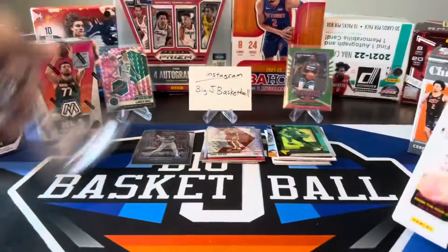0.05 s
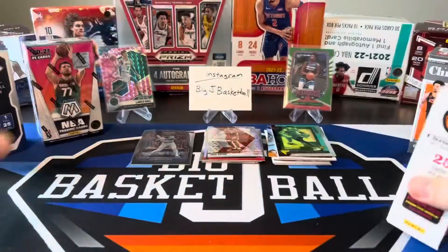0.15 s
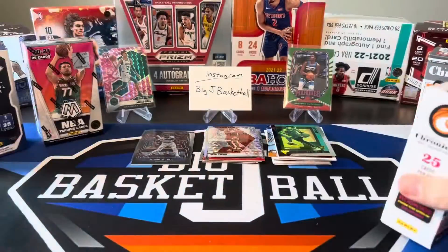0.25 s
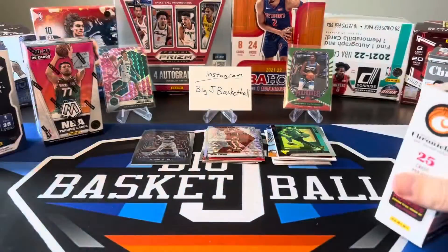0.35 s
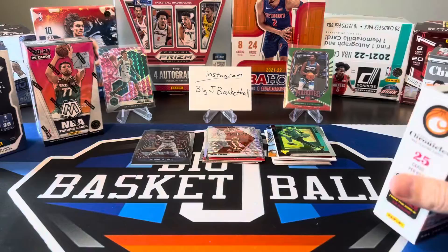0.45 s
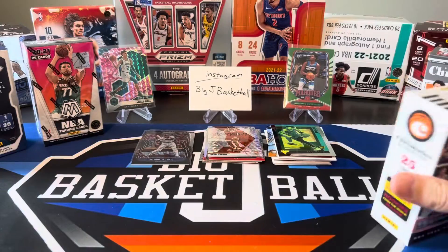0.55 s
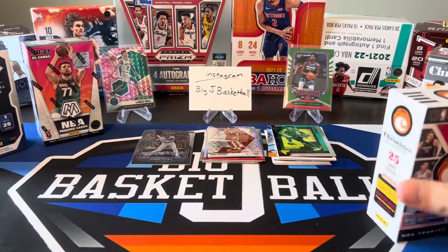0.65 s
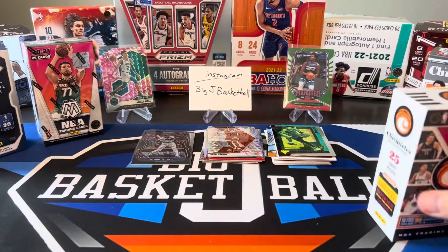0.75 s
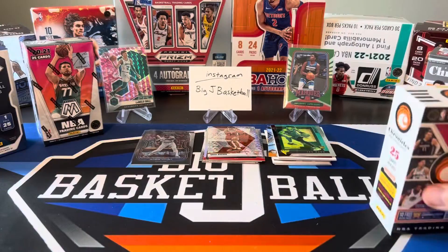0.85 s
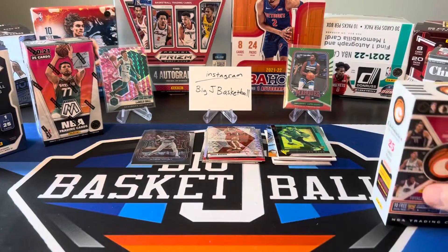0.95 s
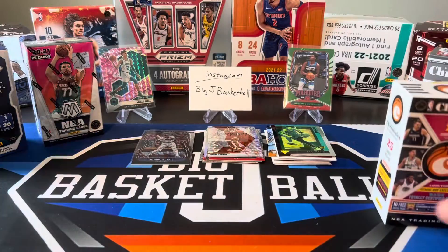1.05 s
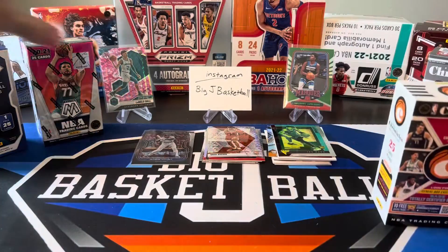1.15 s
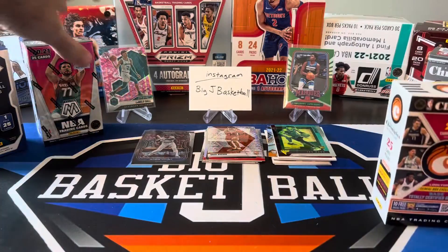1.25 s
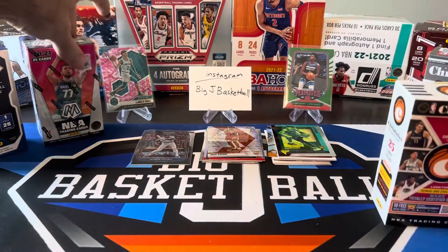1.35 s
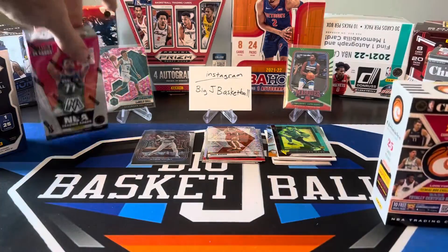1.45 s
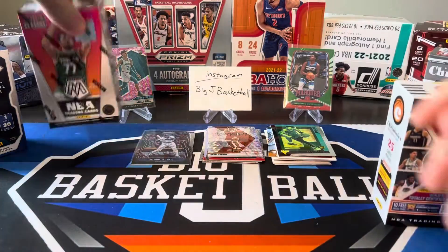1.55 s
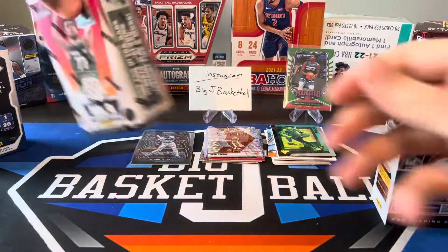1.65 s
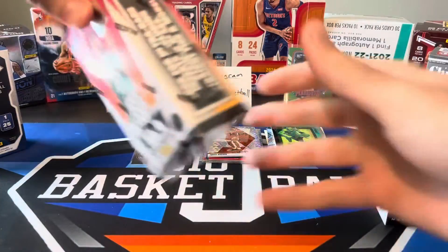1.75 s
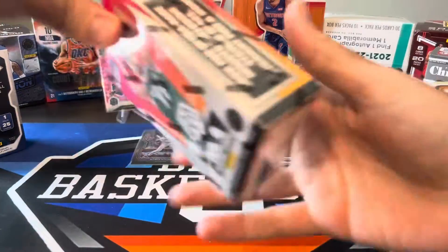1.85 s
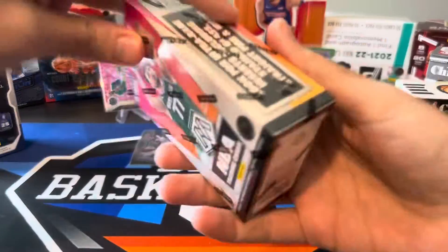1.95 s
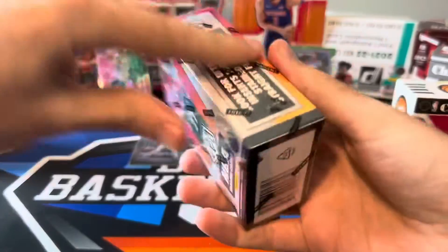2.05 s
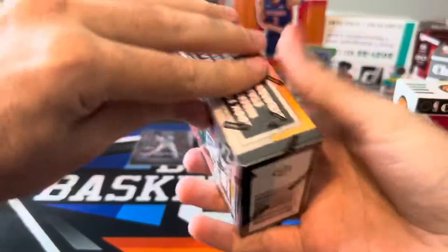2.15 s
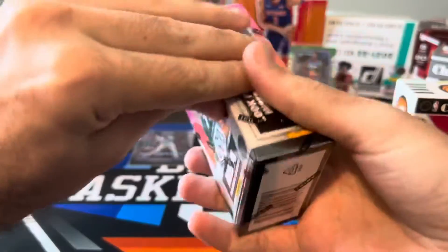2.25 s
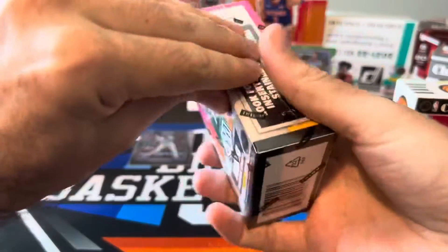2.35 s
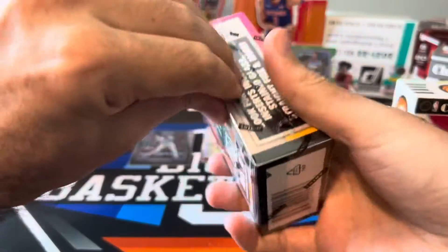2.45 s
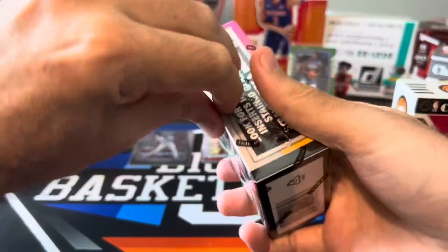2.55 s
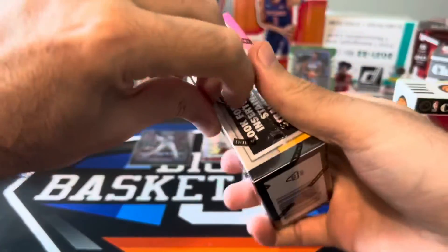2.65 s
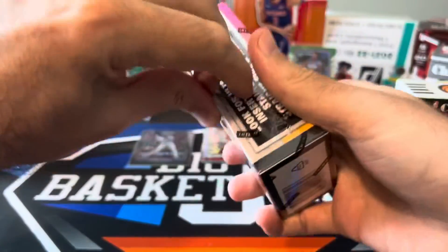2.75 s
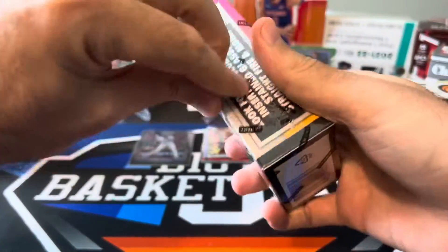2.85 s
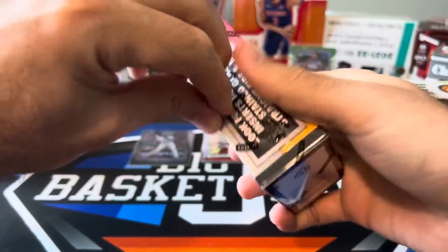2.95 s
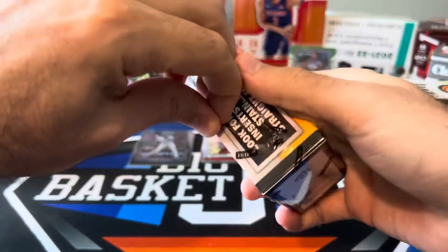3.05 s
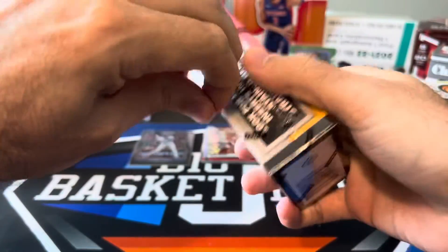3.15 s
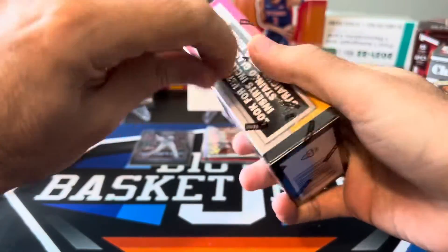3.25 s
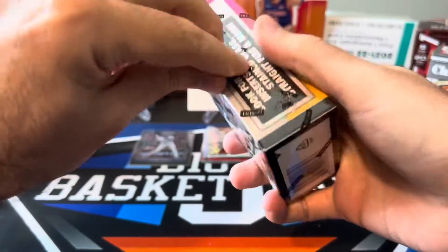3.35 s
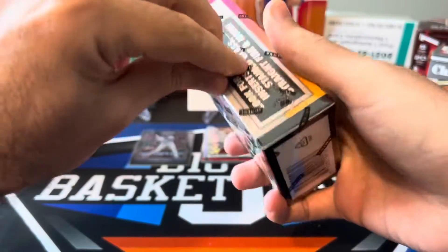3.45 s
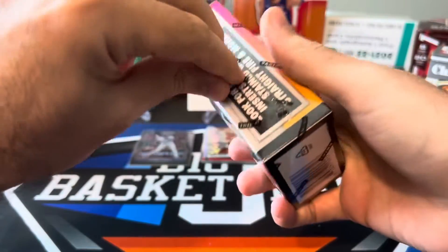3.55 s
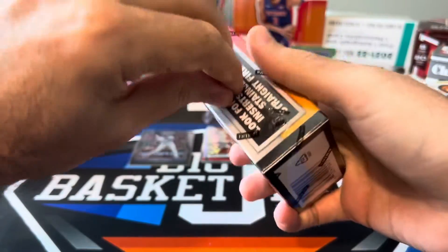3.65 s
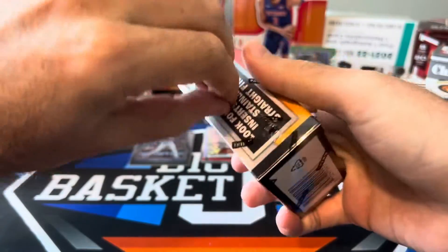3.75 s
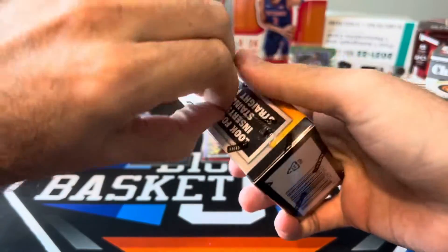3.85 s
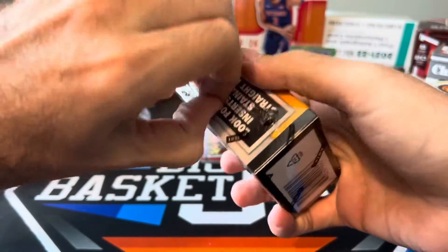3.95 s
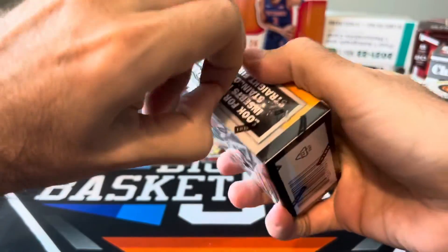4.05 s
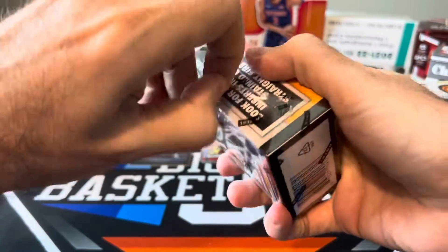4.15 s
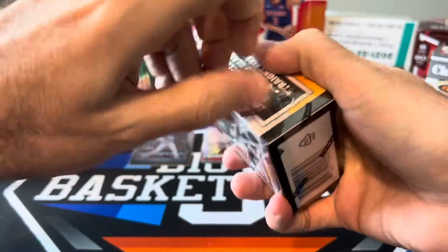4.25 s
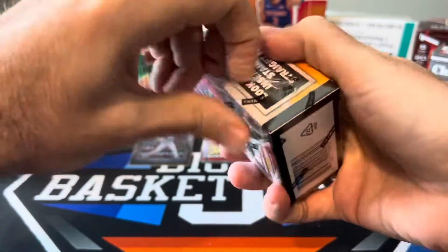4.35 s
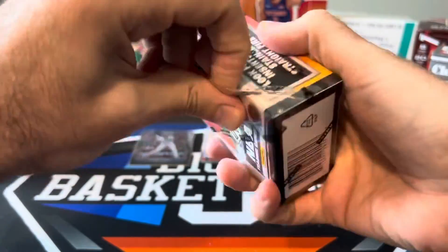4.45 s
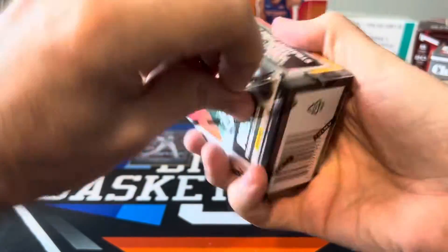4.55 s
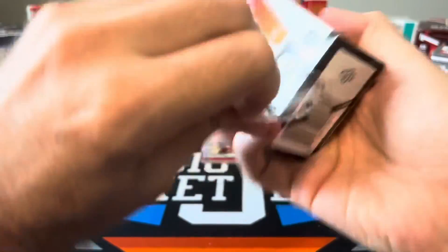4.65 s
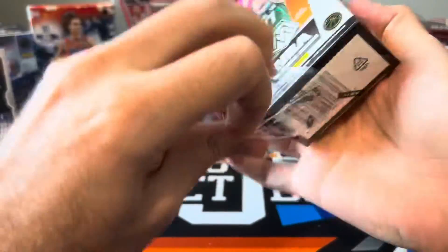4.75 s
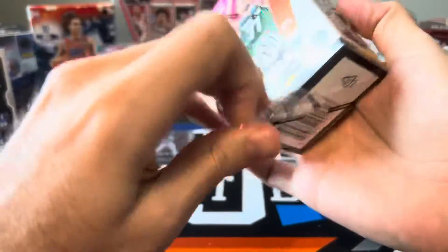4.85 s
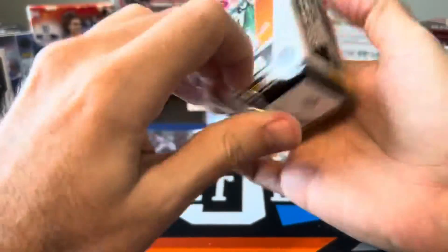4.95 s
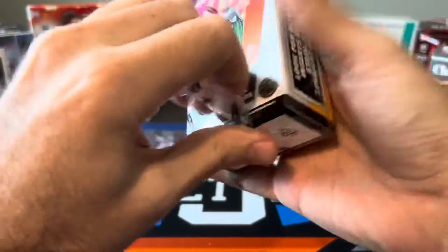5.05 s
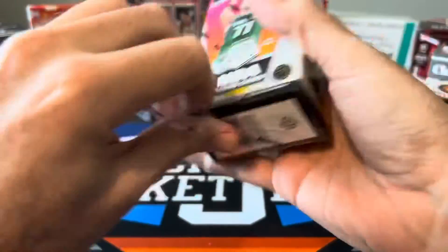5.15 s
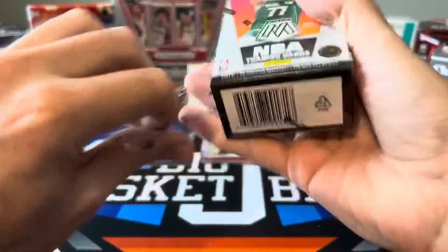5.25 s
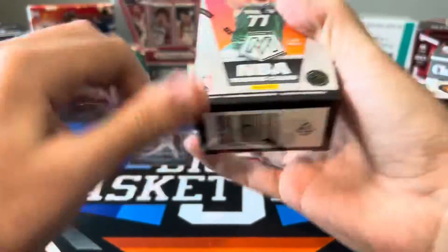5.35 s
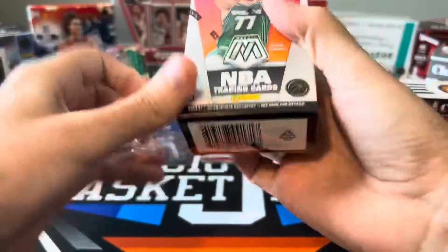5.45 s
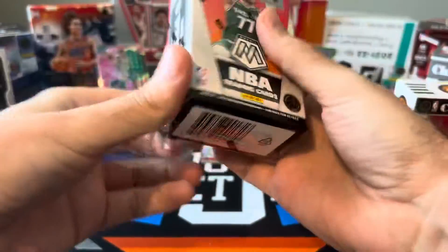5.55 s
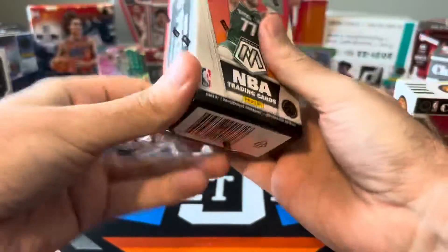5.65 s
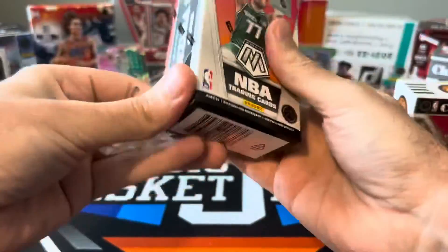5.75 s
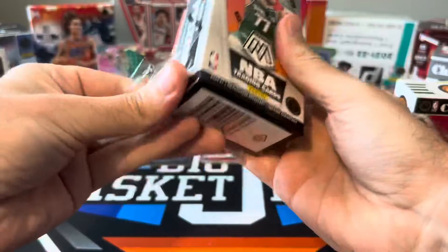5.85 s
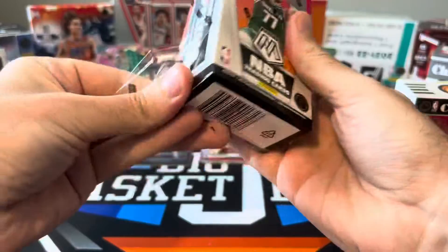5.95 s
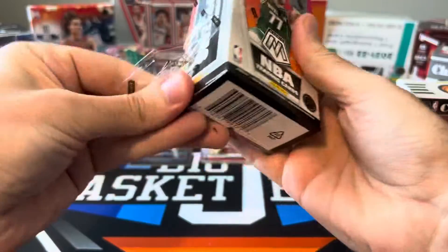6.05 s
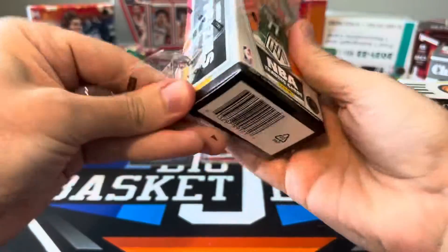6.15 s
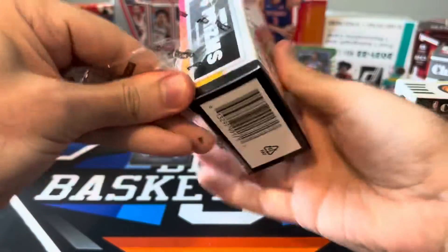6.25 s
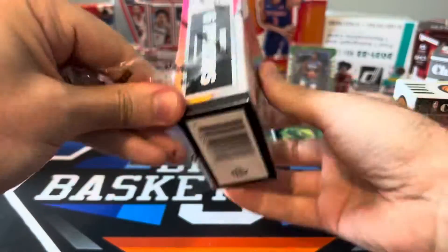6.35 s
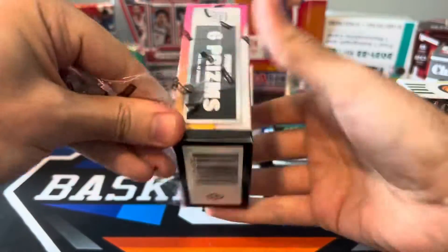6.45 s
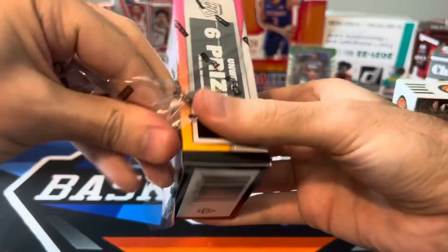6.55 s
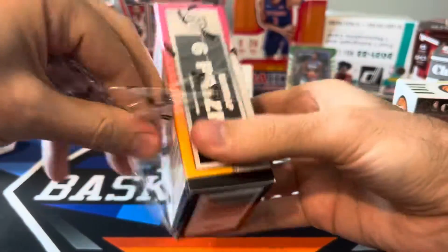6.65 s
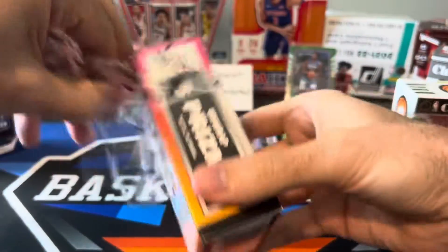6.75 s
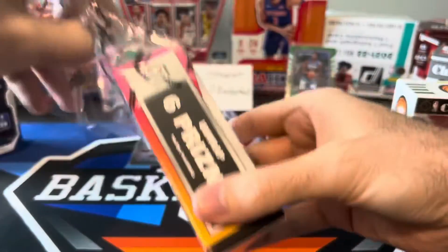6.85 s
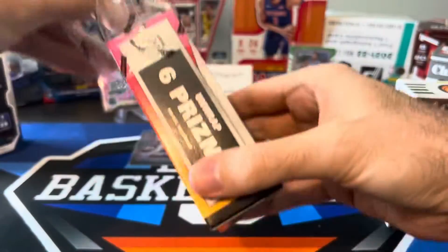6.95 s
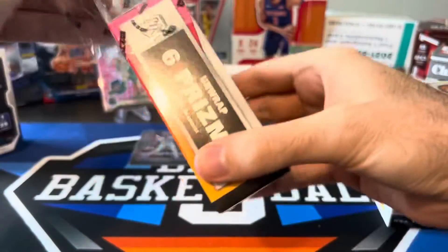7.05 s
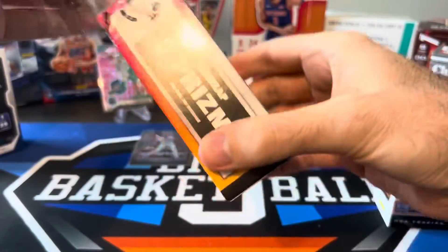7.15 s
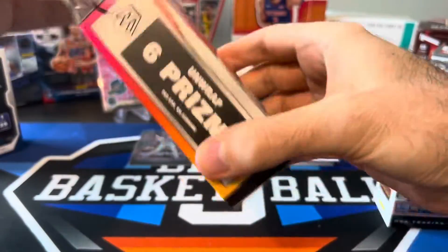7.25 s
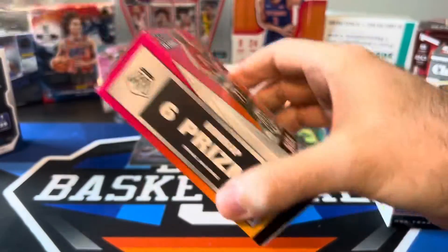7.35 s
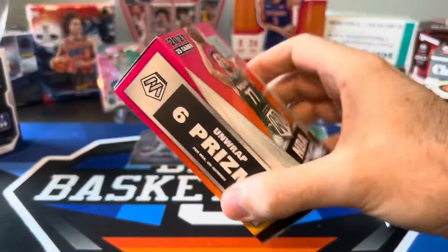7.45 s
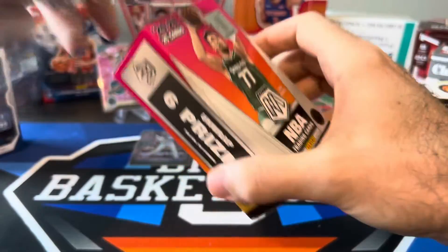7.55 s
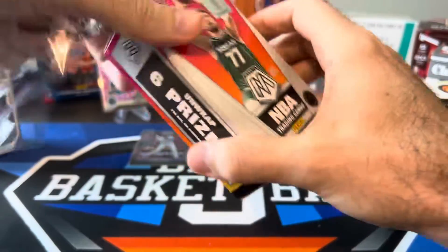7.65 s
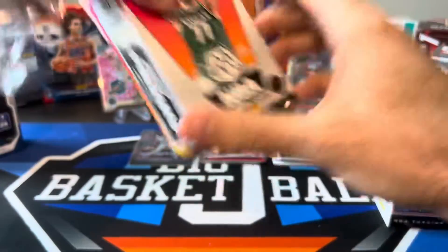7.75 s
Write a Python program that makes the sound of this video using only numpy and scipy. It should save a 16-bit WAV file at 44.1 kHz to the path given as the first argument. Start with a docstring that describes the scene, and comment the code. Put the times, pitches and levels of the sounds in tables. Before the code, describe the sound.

Close-up unwrapping of a small card box: sparse taps and rustles, then sharp film snaps and busy, bright plastic crackling, over faint room hum.

```python
"""Clear plastic wrap is torn off a small cardboard box, close to the microphone in a small room.
The taut film lets go in bright ringing snaps; the loose film crinkles in trains of tiny clicks over a hiss.
Knocks ring the hollow walls and the air in the box, and fingers rub on the card in dull stick-slip grains.
Behind them lie a desk rumble, a low hum and still air, all from filtered noise and a sine.
Film and box also reach both microphone ports by way of the room's echoes."""
import sys
import numpy as np
from scipy import signal
from scipy.fft import rfft, irfft, next_fast_len
from scipy.io import wavfile
from scipy.ndimage import uniform_filter1d

SR = 44100
rng = np.random.default_rng(int(sys.argv[2]) if len(sys.argv) > 2 else 0)


def store_wav(level_fs):
    """Save 16-bit WAV to argv[1]."""
    pcm = np.round(np.clip(np.atleast_2d(level_fs), -1, 1) * 32767)
    wavfile.write(sys.argv[1], SR, pcm.T.astype(np.int16))


N = 343539
TIME = np.arange(N) / SR
# one short blow, and the whole track with a second to spare: lengths in samples, frequency bins in Hz
SHORT, LONG = 2048, next_fast_len(N + SR, True)
SHORT_HZ = np.maximum(np.fft.rfftfreq(SHORT, 1 / SR), 1)
LONG_HZ = np.maximum(np.fft.rfftfreq(LONG, 1 / SR), 1)

# How alike diffuse sound is at the two ports. Each row: frequency in Hz, likeness from 0 to 1.
ROOM_LIKENESS = [(100, 0.91), (300, 0.846), (700, 0), (2000, 0.4), (14000, 0.48)]


def from_db(db):
    """Decibels to amplitude gain."""
    return 10 ** (np.asarray(db) / 20)


def rms_one(x):
    """Scale to unit rms."""
    return x / np.sqrt(np.mean(x ** 2) + 1e-20)


def at_hz(points, hz):
    """Read a table on a log-frequency axis."""
    f, value = np.transpose(points)
    return np.interp(np.log(hz), np.log(f), value)


def filtered(x, response):
    """Pass a whole track through a frequency response."""
    return irfft(rfft(x, LONG) * response, LONG)[..., :N]


def add(out, s, sound):
    """Mix a short sound in at time s in seconds."""
    i = int(np.clip(round(s * SR), 0, N - 1))
    out[:, i:i + SHORT] += sound[:, :N - i]


def pair(spectra, likeness, hz):
    """Two unrelated spectra become left and right with the given likeness."""
    alike = np.clip(at_hz(likeness, hz), 0, 1)
    middle = np.sqrt((1 + alike) / 2) * spectra[0]
    side = np.sqrt((1 - alike) / 2) * spectra[1]
    return middle + side * [[1], [-1]]


def drift(per_s):
    """A wander along straight lines between normal random values, per_s of them each second."""
    knots = rng.standard_normal(4096)
    return np.interp(TIME * per_s, np.arange(len(knots)), knots)


def noise(spectrum):
    """Steady stereo noise of the given colour; rms 1."""
    white = pair(rfft(rng.standard_normal((2, LONG))), ROOM_LIKENESS, LONG_HZ)
    return rms_one(irfft(white * from_db(at_hz(spectrum, LONG_HZ)), LONG)[:, :N])


def flutter(t60, smooth_hz, rise_s=.0001):
    """Stereo spectrum of a sheet's many short-lived modes: a noise burst that swells and dies over t60 s."""
    # How alike close sound is at the two ports. Each row: frequency in Hz, likeness from 0 to 1.
    near_likeness = [(100, 0.884), (700, 0.92), (3000, 0.44), (14000, 0.94)]
    t = np.arange(SHORT) / SR
    burst = rng.standard_normal((2, SHORT)) * from_db(-60 * t / t60) * (1 - np.exp(-t / rise_s))
    modes = pair(rfft(burst), near_likeness, SHORT_HZ)
    middle_power = np.abs(modes.mean(axis=0)) ** 2
    side_power = 0.095 * np.abs(modes[0] - modes[1]) ** 2
    # even out the power over frequency, but keep detail finer than smooth_hz
    power = uniform_filter1d(middle_power + side_power, max(3, int(smooth_hz * SHORT / SR)))
    return modes / np.sqrt(power)


def causal(db):
    """Minimum-phase response for a short spectrum in dB: nothing sounds before the blow."""
    cepstrum = irfft(np.log(from_db(db)))
    cepstrum[1:SHORT // 2] *= 2
    cepstrum[SHORT // 2 + 1:] = 0
    return np.exp(rfft(cepstrum))


def grains(spectrum, per_s, spread_db, t60, vary_db, count):
    """Random slips of very uneven size, dealt to patches with a colour and ring of their own; rms 1."""
    sizes = from_db(spread_db * np.minimum(rng.exponential(1, N), 4)) * rng.choice([-1, 1], N)
    clicks = sizes * (rng.random(N) < per_s / SR)
    dealt, out = rng.integers(0, count, N), 0
    for patch in range(count):
        # each point of the colour shifts by up to vary_db either way
        shift_db = vary_db * (2 * rng.random((len(spectrum), 1)) - 1)
        own = np.array(spectrum) + [0, 1] * shift_db
        ring = irfft(flutter(t60, smooth_hz=5685) * causal(at_hz(own, SHORT_HZ)))
        patch_clicks = (clicks * (dealt == patch))[None]
        out = out + signal.oaconvolve(patch_clicks, ring[:, :SHORT // 2], axes=1)[:, :N]
    # denser clicks come smaller, so the pace alone does not set the loudness
    return rms_one(out / np.sqrt(per_s))


def chance_moments(level_db, spread_db, count):
    """Unevenly scattered times in s, each with a strength in dB that follows the given level."""
    s = (np.arange(count) + rng.random(count)) / count * TIME[-1]
    return s, np.interp(s, TIME, level_db) + spread_db * (2 * rng.random(count) - 1)


def jostle(rub_db, rest_db=-68, arms_db=-65, follows=0.46, fade_s=0.045):
    """Level of the desk's rumble in dB: the arms pass on some of the rubbing, each bump shakes it briefly."""
    # Arms and box bump the desk. Each row: start in seconds, level in dB.
    bumps = [(0.52, -50), (1.29, -46), (1.89, -46.5), (3.09, -56), (3.47, -64), (4.19, -55), (4.98, -53),
             (5.42, -43), (5.79, -58), (6.38, -49.5), (6.64, -44), (6.771, -40), (7.01, -42.5),
             (7.25, -46.5), (7.647, -46)]
    power = from_db(rest_db) ** 2 + from_db(arms_db + follows * (rub_db - rub_db.mean())) ** 2
    for s, level_db in bumps:
        shaken = power[int(s * SR):][:SR // 2]
        shaken += (from_db(level_db) * np.exp(-TIME[:len(shaken)] / fade_s)) ** 2
    return 10 * np.log10(power)


def background(jostle_db, lumpy_db=6.0, hum_hz=120, hum_db=-69, air_db=-70):
    """Dull jostling of the desk as wavering low noise, a steady mains hum and still air."""
    # Colours of desk and air. Each row: frequency in Hz, relative density in dB per Hz.
    desk = [(20, -40.5), (35, -13.5), (55, 1.5), (80, 1), (125, 2.5), (180, -5), (280, -13.5), (600, -42)]
    air = [(30, -14.5), (120, 5.5), (250, -4.5), (500, -15), (1500, -24), (5000, -32.5), (15000, -44)]
    rumble = from_db(jostle_db + lumpy_db * drift(22)) * noise(desk)
    hum = from_db(hum_db) * np.sqrt(2) * np.sin(2 * np.pi * hum_hz * TIME)
    return rumble + hum + from_db(air_db) * noise(air)


def room(x, first_s=0.0071, early=1.0, early_s=0.049):
    """Echoes start with desk and shelves; each band of the tail dies at its own pace, slowest near 1.5 kHz."""
    # Strength of the echoes. Each row: frequency in Hz, echo energy relative to direct in dB.
    room_level = [(100, -11), (400, -10.5), (1000, -9.5), (3000, -8.5), (7000, -11), (14000, -27)]
    # Decay of the late tail. Each row: frequency in Hz, time to fall 60 dB in seconds.
    room_t60 = [(100, 0.28), (500, 0.13), (1500, 0.42), (3500, 0.39), (7000, 0.29), (15000, 0.21)]
    t, hz = np.arange(SR // 2) / SR, np.maximum(np.fft.rfftfreq(SR // 2, 1 / SR), 1)
    white = pair(rfft(rng.standard_normal((2, SR // 2))), ROOM_LIKENESS, hz)
    centres = np.geomspace(100, 16000, 10)   # overlapping bands, Hz
    tail = 0
    for centre, share in zip(centres, np.eye(len(centres))):
        decay = from_db(-60 * t / at_hz(room_t60, centre))
        fade = (t > first_s) * decay * (1 + early * np.exp(-t / early_s))
        band = irfft(white * np.interp(np.log(hz), np.log(centres), share))
        tail = tail + band * fade / np.linalg.norm(fade) * from_db(at_hz(room_level, centre))
    return filtered(x, rfft(tail, LONG))


def hands(holding_db=-4.5, attack_s=0.0051, sag_db_per_s=17, release_s=0.034):
    """Driving levels of film and rubbing in dB: strokes swell, sag as the film yields, then die away."""
    # The loose film stirs between strokes, liveliest late on. Each row: time in seconds, level in dB.
    loose_film = [(0, -66.5), (.65, -71), (1.05, -83.5), (1.8, -88), (2.1, -73.5), (2.7, -77.5), (3.3, -88),
                  (3.6, -75.5), (3.8, -76), (4.3, -65), (4.7, -60), (6.3, -56.5), (6.6, -53.5), (7.4, -56),
                  (7.78, -66.5)]
    # The hands grip, pull or crumple. Each row: start in seconds, length in seconds,
    # crinkling film in dB, rubbing on card in dB; both levels are those at the start, before the sag.
    strokes = [(0.0, .21, -47, -56.5), (0.28, 0.34, -55, -61), (0.783, 0.032, -61, -60),
               (0.895, .03, -65, -59.5), (1.149, 0.04, -55.5, -62.5), (1.222, 0.094, -66, -64.5),
               (1.894, .07, -70.5, -52.5), (2.029, 0.131, -67, -63), (2.176, 0.15, -63.5, -54.5),
               (2.38, 0.097, -60.5, -49), (2.561, 0.076, -64, -52.5), (2.798, 0.16, -70, -63),
               (3.003, 0.33, -69.5, -60), (3.843, 0.14, -65, -64), (4.05, 0.031, -58, -71),
               (4.127, 0.07, -62.5, -49.5), (4.35, 0.17, -51.5, -52.5), (4.567, 0.066, -43.5, -39.5),
               (4.681, 0.024, -43.5, -48.5), (4.796, 0.081, -43.5, -49), (4.965, 0.1, -53.5, -47),
               (5.103, 0.092, -43.5, -42), (5.271, 0.038, -42.5, -50.5), (5.394, 0.2, -43.5, -48.5),
               (5.661, 0.051, -49, -59), (5.806, 0.037, -44.5, -79), (5.923, 0.0359, -50.5, -49),
               (6.038, 0.044, -52.5, -55.5), (6.417, 0.12, -54, -54), (6.578, 0.3, -36.5, -44.5),
               (6.714, 0.034, -37, -36), (6.88, 0.18, -63, -54.5), (6.989, 0.0395, -35.5, -50),
               (7.081, 0.099, -43, -52), (7.224, 0.035, -38.5, -39.5), (7.32, 0.015, -35.5, -52),
               (7.374, 0.11, -50, -64), (7.614, 0.094, -54, -52.5)]
    loose = from_db(np.interp(TIME, *np.transpose(loose_film)))
    # fingers that only hold the box rub holding_db relative to the loose film
    power = np.array([loose, loose * from_db(holding_db)]) ** 2
    for start, length, film_db, rub_db in strokes:
        near = slice(max(0, int((start - .1) * SR)), int((start + length + .4) * SR))
        t = TIME[near] - start
        swell = np.exp(np.minimum(t, 0) / attack_s - np.maximum(t - length, 0) / release_s)
        power[:, near] += (from_db([[film_db], [rub_db]]) * swell * from_db(-sag_db_per_s * t)) ** 2
    return 10 * np.log10(power)


def rubbing(rub_db, gain_db=-1.5):
    """Fingers stick and slip on the hollow box: dull grains at a wandering pace."""
    # Colour of rubbed card. Each row: frequency in Hz, relative density in dB per Hz.
    card = [(120, -17), (250, -3.5), (400, 1), (600, -5), (900, -7.5), (1200, -10), (1700, -9.5),
            (3000, -15.5), (7000, -28)]
    pace = 350 * from_db(4.9 * drift(25))   # slips per second
    slips = grains(card, pace, spread_db=3.0, t60=0.07, vary_db=3.0, count=12)
    return from_db(rub_db + gain_db) * slips


def small_knocks(rub_db, above_db=47, spread_db=5, wall_hz=750, spread_octaves=0.73, q=3.0, most_db=-3):
    """Small ringing pops scattered through the track, mostly pitched between 0.5 and 3 kHz and louder where the
    rubbing is stronger; rows as in the table of knocks."""
    s, level_db = chance_moments(rub_db + above_db, spread_db, count=70)
    pitch = wall_hz * 2 ** (spread_octaves * rng.standard_normal(len(s)))
    return np.column_stack([s, np.minimum(level_db, most_db), pitch, np.full(len(s), q)])


def bending(lag_s=.012, knee_hz=350):
    """Bending waves are slower at low pitch, so each blow chirps downward."""
    return np.exp(-2j * np.pi * lag_s * knee_hz * np.log1p(SHORT_HZ / knee_hz))


def box_knocks(light_taps, rattle=0.71, firmness=0.36, rattle_t60=0.033, rattle_rise_s=0.0012, soft_hz=3000,
               air_hz=417, air_width_hz=110, air_db=-6.5):
    """A blow drives a damped wall and the air behind it; other panels rattle. Rows: left, right, all round."""
    # A wall is knocked or pops back. Each row: start in seconds, level in dB,
    # wall resonance in Hz, sharpness Q.
    knocks = [(0.2956, -1.5, 575, 1.8), (0.5215, -2.5, 250, 0.13), (0.542, 3.5, 235, 5.8),
              (0.6866, -10.5, 1810, 2.8), (0.7544, -13.5, 250, 0.34), (0.894, -13.5, 230, .3),
              (1.18, -4, 280, 3.4), (1.2997, -4, 169, 2.3), (1.332, 4.5, 710, 2.5), (1.7, -13.5, 360, 9.6),
              (1.884, -11, 895, .4), (1.8993, 0.5, 216, 0.8), (1.936, -1.5, 402, 4.1), (2.1, -8, 765, 0.72),
              (2.116, -0.5, 560, 0.79), (2.385, -18, 480, 0.76), (2.4286, 4, 470, 1.1),
              (2.522, 5.5, 570, 0.91), (2.568, 7.5, 880, 4.9), (2.616, -6.5, 640, 0.14),
              (2.869, 1.5, 700, 1.15), (3.029, -10.5, 540, 0.75), (3.0827, 12.5, 600, 0.62),
              (3.727, -23, 588, 1.34), (3.9095, -6.5, 654, 0.66), (3.99, -4, 1100, 0.13),
              (4.1799, -0.5, 680, 0.15), (4.196, 2, 424, 7.2), (4.3074, -6, 800, 0.1),
              (4.38, 20.5, 1220, 1.25), (4.589, 21, 1660, 3.2), (4.764, 3, 232, 0.58),
              (4.909, -1.5, 270, 0.32), (4.9877, 11, 560, 0.18), (5.055, -4, 290, 0.087),
              (5.0625, 1, 2440, 3.9), (5.2011, 14, 780, 1.55), (5.356, -6.5, 460, 0.3),
              (5.424, 2.5, 613, 0.072), (5.511, -1.5, 540, .7), (5.662, 5, 350, 0.63),
              (5.7235, 11, 322, 0.69), (5.782, 14.5, 323, 0.5), (6.1018, -0.5, 1500, 2.2),
              (6.15, -14, 1500, .6), (6.1626, 4, 1260, .9), (6.3257, -5, 527, .35), (6.342, -3, 430, 0.37),
              (6.3726, 1.5, 370, 0.09), (6.506, -1.5, 290, 0.13), (6.6283, 22, 460, 2.5),
              (6.644, 7, 370, 0.088), (6.786, 8, 730, 0.084), (6.797, 3, 403, 0.54),
              (6.9688, 7.5, 229, 1.6), (7.0252, 5, 304, 0.14), (7.189, 4, 523, 0.29),
              (7.252, 8.5, 442, 0.11), (7.2822, 11, 624, 5.4), (7.4053, -2.5, 500, 2.3),
              (7.6403, 1.5, 276, 0.072), (7.709, -5, 600, 0.28)]
    out, hz = np.zeros((3, N)), SHORT_HZ
    air = from_db(air_db) / (1 + 1j * air_hz / air_width_hz * (hz / air_hz - air_hz / hz))
    for s, level_db, wall_hz, q in [*knocks, *light_taps]:
        resonance = 1 / (1 + 1j * q * (hz / wall_hz - wall_hz / hz))
        # two gentle low-passes soften the blow
        wall = bending() * (air + resonance) / (1 + 1j * hz / (2 * wall_hz)) / (1 + 1j * hz / soft_hz)
        # light touches scuff and rattle, firm ones pop cleanly
        scuff = rattle * from_db(-firmness * (level_db - 12.5)) * hz / (hz + 200)
        panels = wall * (1 + scuff * flutter(rattle_t60, 750, rattle_rise_s))
        panels *= np.linalg.norm(wall) / np.linalg.norm(panels.mean(axis=0))
        # the far panels ring on at their own pace, so the box feeds the room diffusely
        around = wall * flutter(t60=.08, smooth_hz=250).mean(axis=0)
        add(out, s, from_db(level_db) * irfft(np.vstack([panels, around])))
    return out


def crinkle(film_db, creases_per_s=750, busy=0.36, crease_db=2.0, fold_db=-7.0, buckle_db=-70.0, slide_db=-13):
    """Gently handled film mostly slides and hisses; worked harder, its creases and folds flip ever faster."""
    # Colours of the creases and of the larger folds of loose film.
    # Each row: frequency in Hz, relative density in dB per Hz.
    film = [(300, -11.5), (900, -0.5), (2000, -5), (3300, -2.5), (5000, 4.5), (8000, 5.5), (12500, 6),
            (14500, 4), (15600, 3), (16300, -26.5)]
    fold_colour = [(400, -10.5), (800, -10), (1150, -1.5), (1600, 0), (2200, -0.5), (3000, 5.5), (4200, -3),
                   (6000, -16), (9000, -15)]
    pace = from_db(busy * np.clip(film_db + 50, -30, 15) + 6.0 * drift(45))
    creases = grains(film, creases_per_s * pace, spread_db=5.5, t60=0.026, vary_db=14.0, count=18)
    folds = grains(fold_colour, 110 * pace, spread_db=2.0, t60=0.032, vary_db=23.5, count=16)
    flips = from_db(crease_db) * creases + from_db(fold_db) * folds
    # share of buckling film: half at buckle_db, nearly all of it well above
    buckling = 1 / (1 + from_db(buckle_db - film_db))
    sliding = np.sqrt(from_db(2 * slide_db) + .5 * (1 - buckling))
    return from_db(film_db) * (np.sqrt(buckling) * flips + sliding * noise(film))


def small_snaps(film_db, above_db=32, spread_db=8, crack_db=-8, crack_spread_db=5, ring_hz=10000,
                spread_octaves=0.35, most_db=-8):
    """Single creases flip over, louder where the film moves more; rows as in the table of snaps."""
    s, level_db = chance_moments(film_db + above_db, spread_db, count=150)
    tautness, smallness = rng.standard_normal((len(s), 2)).T
    cracks_db = crack_db + crack_spread_db * tautness
    rings_hz = ring_hz * 2 ** (spread_octaves * smallness)
    return np.column_stack([s, np.minimum(level_db, most_db), cracks_db, rings_hz])


def film_snaps(crease_flips, rise_s=0.0006, soft_start_s=0.002, soft_start_db=-13.5, gain_db=-2.0, around_db=4.0,
               tick_db=-8.5, sizzle_db=-8.5, facet_db=9.0, facet_octaves=0.42, ring_t60=.008):
    """Film lets go in sharp snaps with a bright ring. Rows: left, right, all round."""
    # A small facet rings higher, a taut one cracks harder near 3 kHz. Each row: start in seconds,
    # level in dB before the common gain, crack relative to that level in dB, ring in Hz.
    snaps = [(0.022, -13, -21, 10600), (0.0922, -8.5, -6, 9500), (0.4765, -12.5, -13, 10000),
             (1.147, -31, -10, 9500), (1.332, -18.5, -11, 6960), (2.1193, -17, 1, 10500),
             (2.1768, -16, -6, 9400), (2.205, -1.5, -12.5, 9000), (2.4294, -4.5, -12.5, 13000),
             (2.5235, -12, 4.5, 10000), (2.571, -6, -3.5, 12500), (2.6285, -15.5, -0.5, 13000),
             (2.8645, -23, -8, 10700), (3.0287, -39, 19.5, 9000), (3.0844, 10, 4, 14450),
             (3.3172, -31.5, 8, 13000), (3.602, -25, -14.5, 10560), (3.8333, -9, -15, 12600),
             (3.8415, -11.5, -4.5, 8400), (3.9904, 5, -2, 9900), (4.0042, -1, -6, 10200),
             (4.0845, -8, -13.5, 9000), (4.18, -3.5, 1, 8900), (4.184, -6, 5.5, 9900),
             (4.339, -8, -6, 11500), (4.3572, 0.5, -2.5, 10000), (4.3627, 0, -3, 12500),
             (4.3808, 14.5, -2, 9900), (4.4893, -14, -5, 10500), (4.5413, -0.5, -7, 10700),
             (4.5567, -4, -1, 14000), (4.5927, 17, -5, 10400), (4.7119, 1, -11, 10400),
             (4.801, -9, -8, 9500), (4.808, -2, -18, 10600), (5.0182, -5.5, -24, 9250),
             (5.1141, -2, -24, 8850), (5.1423, 2.5, -14, 12400), (5.2031, 1.5, -4, 9500),
             (5.3534, -5, -8.5, 10700), (5.4345, -13.5, 8, 9000), (5.5162, -1.5, -4, 13500),
             (5.671, 1.5, -12.5, 9500), (5.7886, -6, -16, 9900), (5.9126, -8, -8, 11000),
             (5.9208, -8, -28, 9500), (5.947, -1, -20, 9100), (5.9876, -6, -11, 9500),
             (6.0289, -1.5, -20, 10000), (6.071, -1.5, -8.5, 7400), (6.115, -8.5, -12, 11600),
             (6.165, 6.5, -11.5, 13000), (6.2153, -8.5, -17, 12500), (6.2375, -3.5, -10.5, 13500),
             (6.4986, -2.5, -9, 8700), (6.6429, 12.5, -9.5, 9000), (6.7566, 0, -2.5, 8950),
             (6.7695, 9.5, -16, 13700), (7.0247, 1, -14, 8300), (7.1605, 4, -10, 9400),
             (7.1905, 0.5, -10, 8950), (7.251, 4, -12, 10200), (7.491, -9, -7.5, 10000),
             (7.6199, -13, -7.5, 9600)]
    # Film over the box rings like a drum skin. Each row: frequency in Hz, width in Hz, level in dB.
    skin_modes = [(1560, 160, 16), (2250, 300, 6.5), (2900, 140, -5), (3605, 200, 1), (4600, 67, 3.5),
                  (6640, 70, -7.5)]
    out = np.zeros((3, N))
    skin = 1 + sum(from_db(db) / (1 + 2j * (SHORT_HZ - hz) / width) for hz, width, db in skin_modes)
    for s, level_db, crack_db, ring_hz in [*snaps, *crease_flips]:
        spectrum = [(150, crack_db - 46.0), (900, crack_db - 20), (1700, crack_db - 11.5),
                    (2500, crack_db - 3), (4000, crack_db),
                    (5800, tick_db), (8800, tick_db), (11800, sizzle_db), (15000, sizzle_db)]
        facet = facet_db * np.exp(-.5 * (np.log2(SHORT_HZ / ring_hz) / facet_octaves) ** 2)
        colour = from_db(level_db + gain_db) * causal(at_hz(spectrum, SHORT_HZ) + facet)
        soft_start = irfft(colour * flutter(ring_t60, 3000, soft_start_s))
        add(out[:2], s - soft_start_s, from_db(soft_start_db) * soft_start)
        add(out[:2], s, irfft(colour * skin * flutter(ring_t60, 2600, rise_s)))
        # summed over all directions, the peaks and dips of the modes even out
        add(out[2:], s, from_db(around_db) * irfft(colour)[None])
    return out


def scene():
    """Box and film reach the two ports directly and by way of the room."""
    # The ports' level difference. Each row: frequency in Hz, left minus right in dB.
    port_balance = [(60, 3), (200, 1), (600, 2), (2000, 3.5), (4000, 5), (8000, 1.5), (15000, -.5)]
    # The ports' phase difference. Each row: frequency in Hz, lead of left over right in radians.
    port_phase = [(100, 0.1), (2000, 0.3), (3800, 1.1), (5900, -.5), (7300, 0.3), (8200, -1), (9100, -2.6),
                  (11000, -3.7), (12500, -6), (14500, -6.8), (15700, -9)]
    film_db, rub_db = hands()
    rustle = crinkle(film_db) + rubbing(rub_db)
    blows = film_snaps(small_snaps(film_db)) + box_knocks(small_knocks(rub_db))
    side = np.array([[1], [-1]]) / 2   # each port takes half the difference
    ports = from_db(side * at_hz(port_balance, LONG_HZ)) * np.exp(1j * side * at_hz(port_phase, LONG_HZ))
    direct = filtered(blows[:2] + rustle, ports)
    echoes = room(blows[2] + rustle.mean(axis=0))
    return direct + echoes + background(jostle(rub_db))


def record(dry, cutoff_hz=16500):
    """The microphone has a dip near 10 kHz; the top is cut steeply."""
    # Response of the microphone. Each row: frequency in Hz, gain in dB.
    microphone = [(20, 1), (8300, -3), (9300, -7), (10700, -13.5), (11500, -1), (14800, -2), (15700, 1),
                  (16400, -16)]
    low_pass = 1 / np.sqrt(1 + (LONG_HZ / cutoff_hz) ** 160)
    return filtered(dry, from_db(at_hz(microphone, LONG_HZ)) * low_pass)


dry = scene()
out = record(dry)
store_wav(out)
```